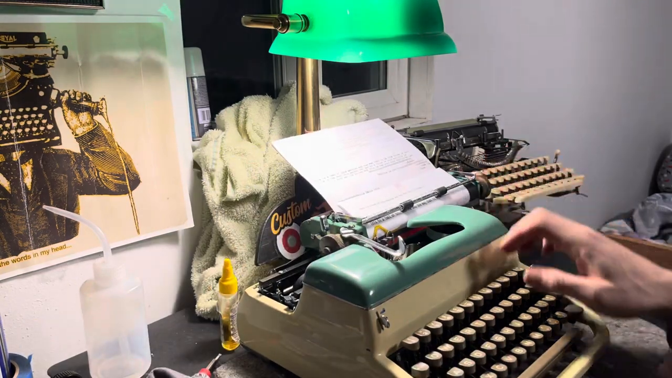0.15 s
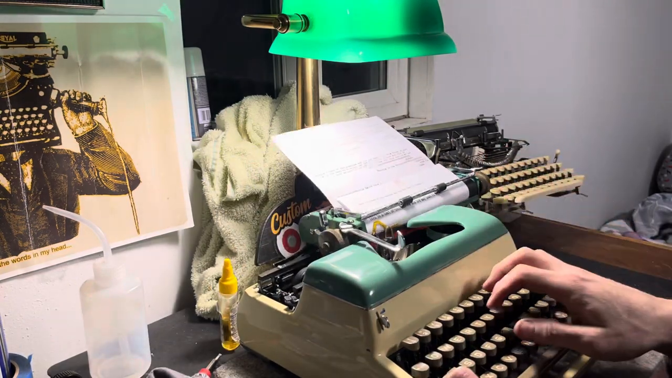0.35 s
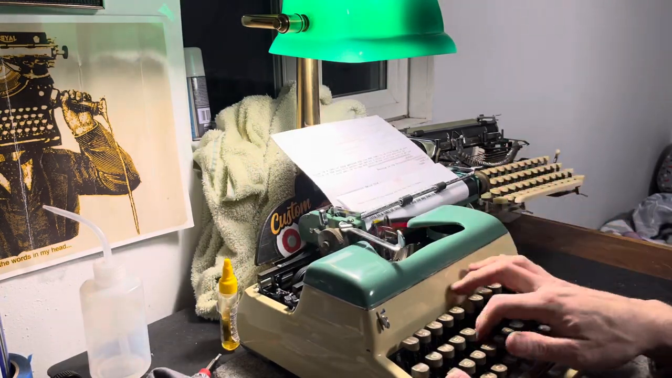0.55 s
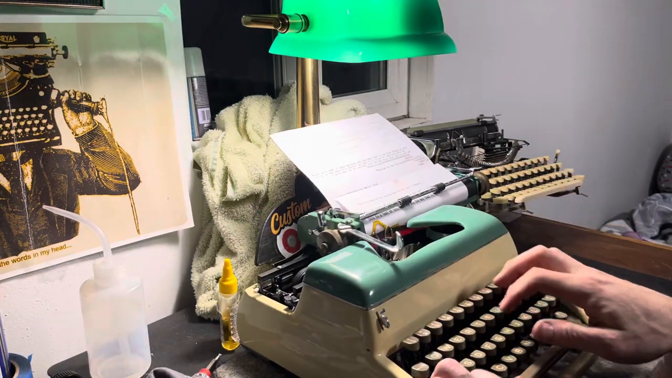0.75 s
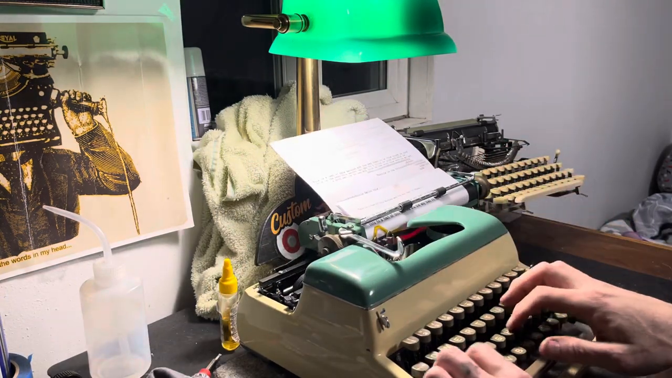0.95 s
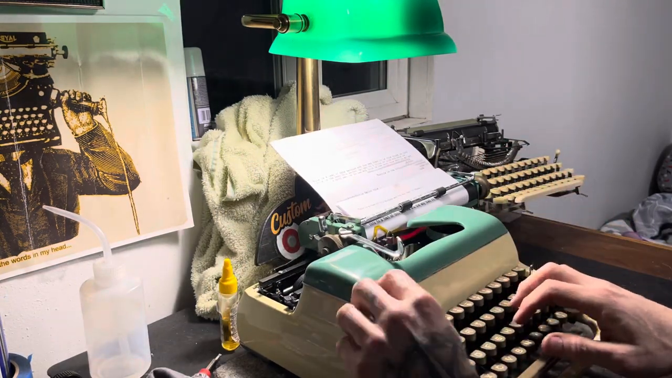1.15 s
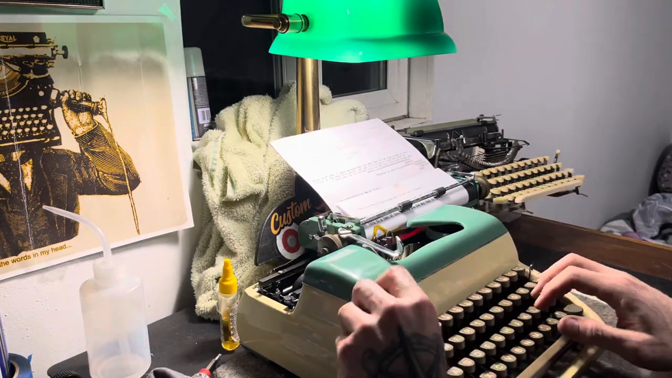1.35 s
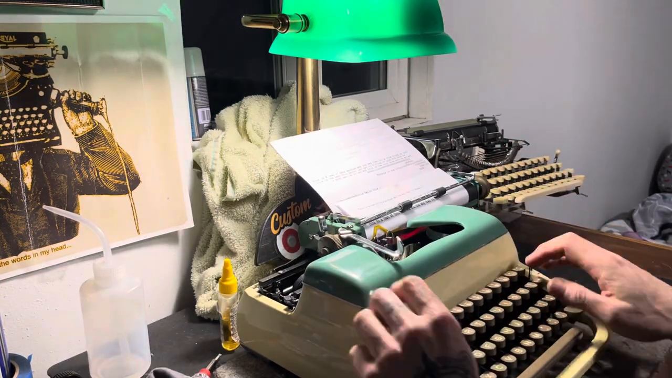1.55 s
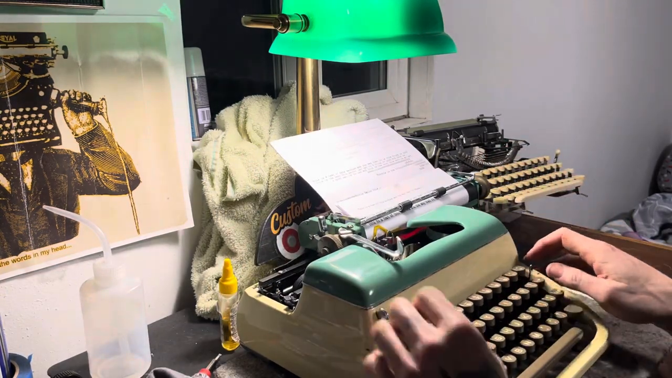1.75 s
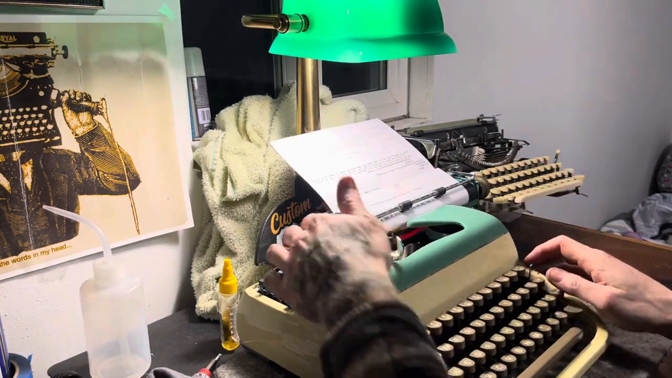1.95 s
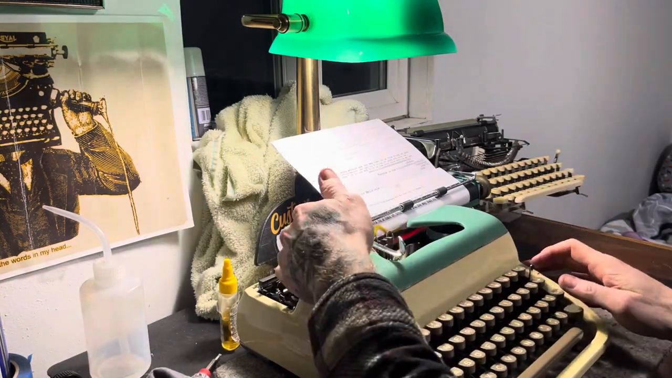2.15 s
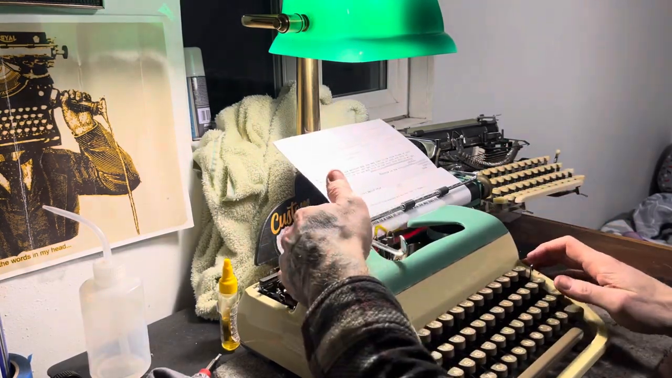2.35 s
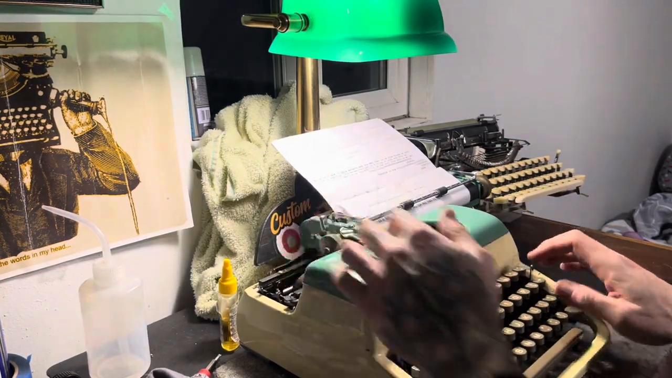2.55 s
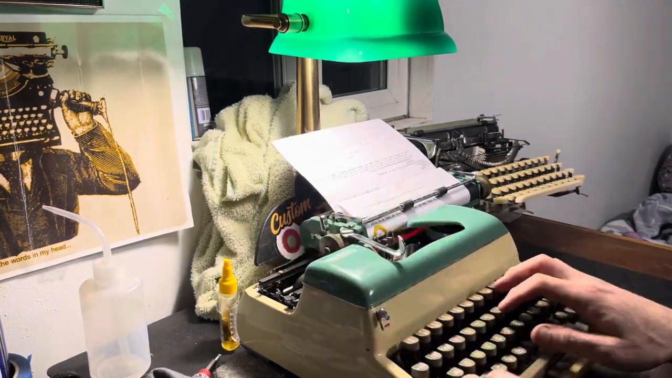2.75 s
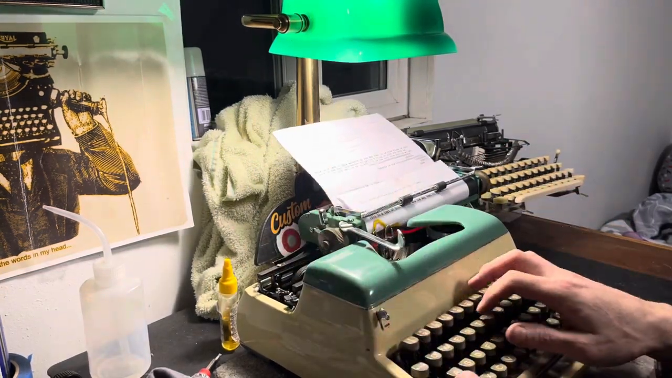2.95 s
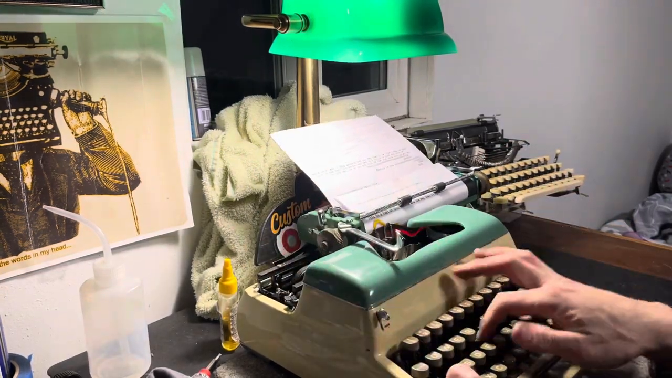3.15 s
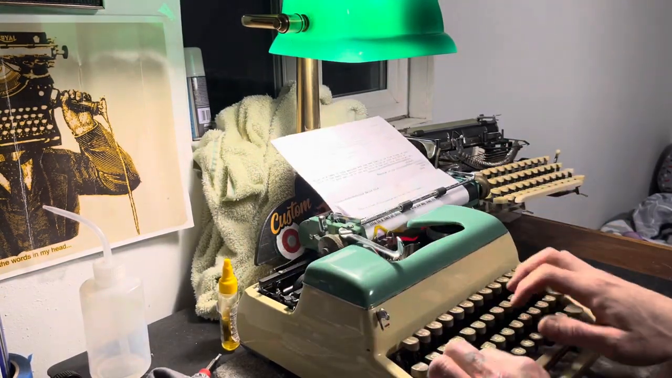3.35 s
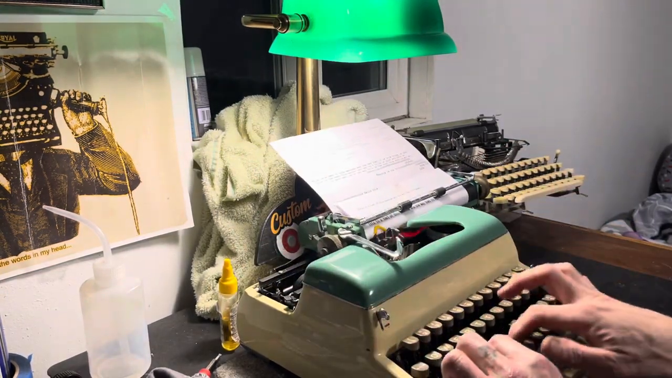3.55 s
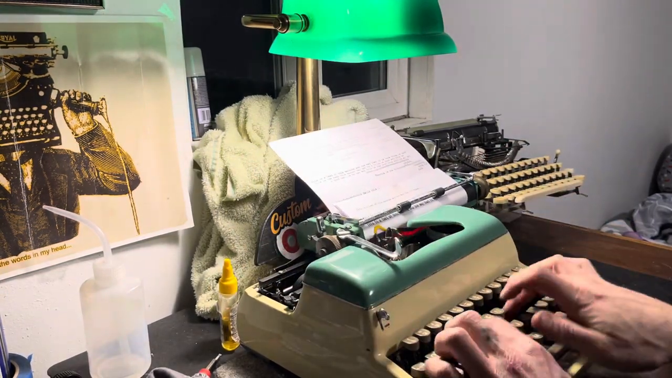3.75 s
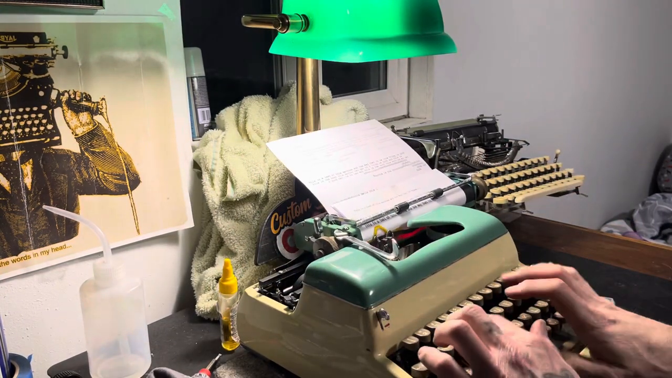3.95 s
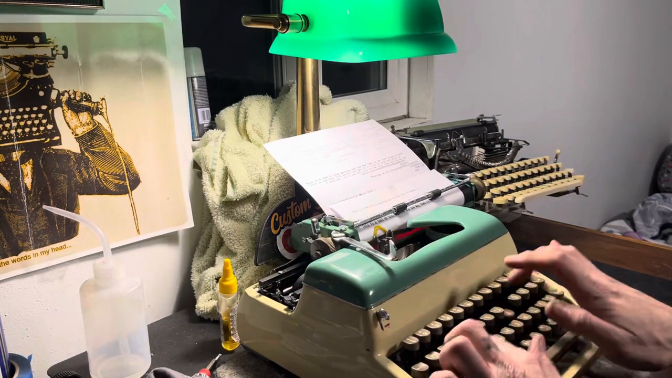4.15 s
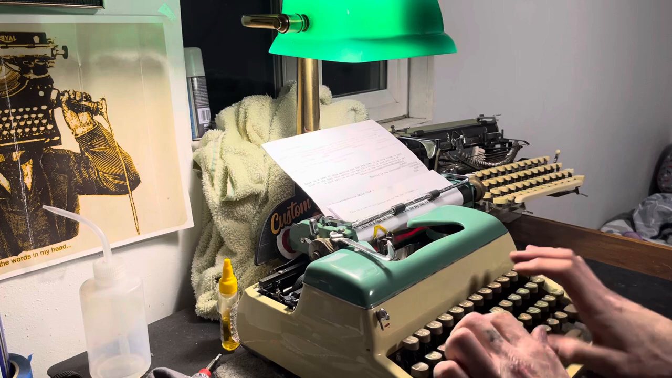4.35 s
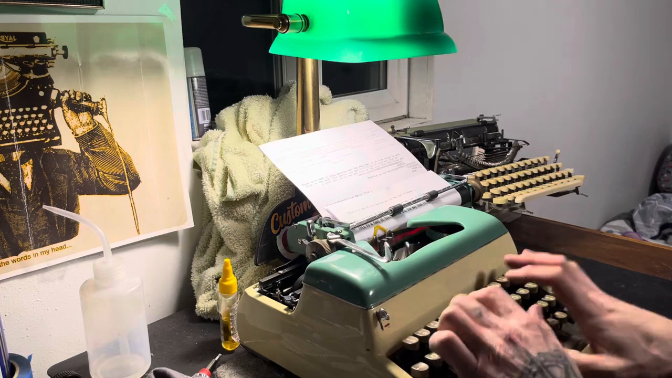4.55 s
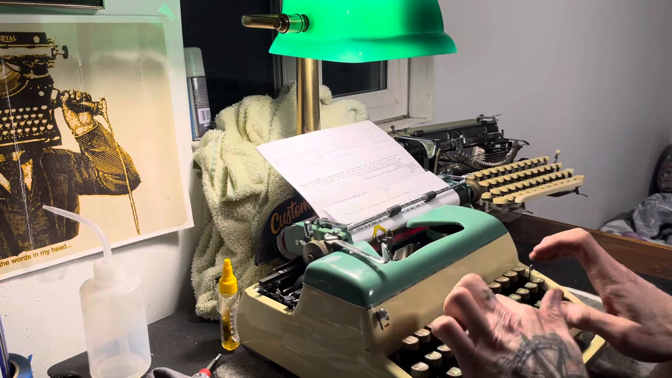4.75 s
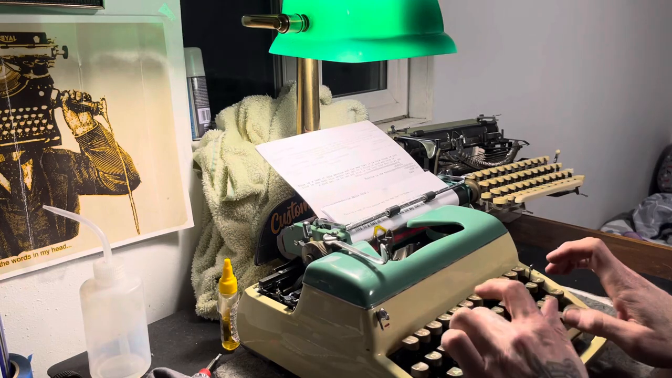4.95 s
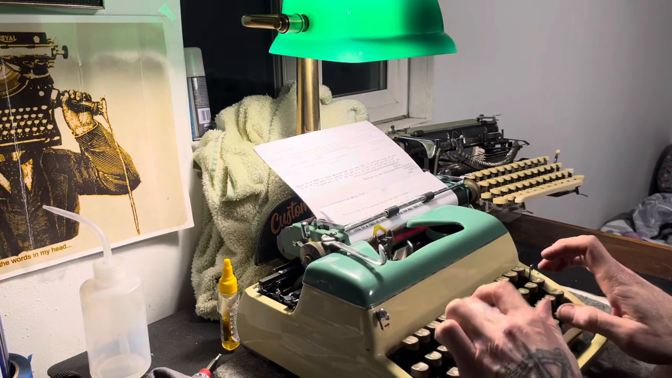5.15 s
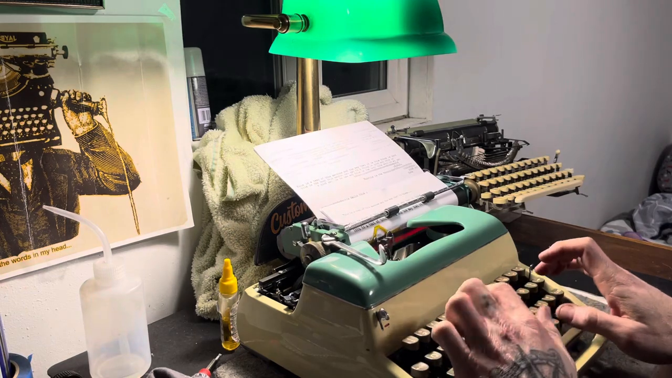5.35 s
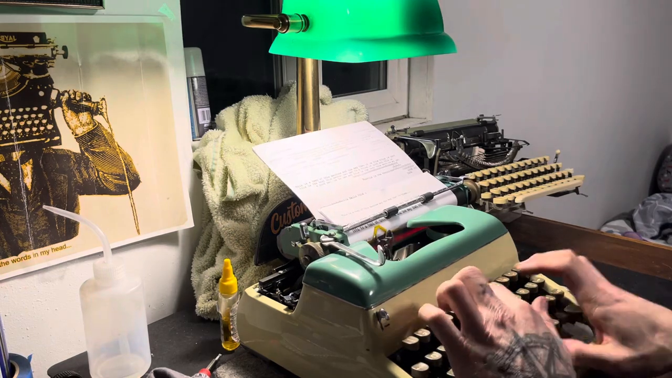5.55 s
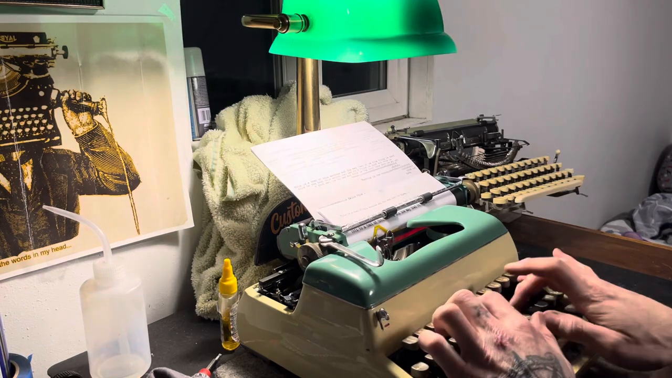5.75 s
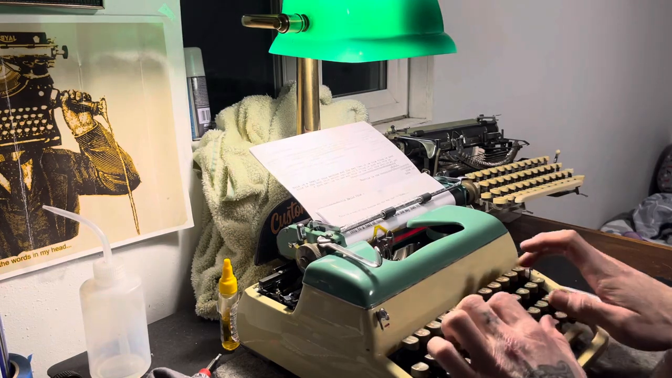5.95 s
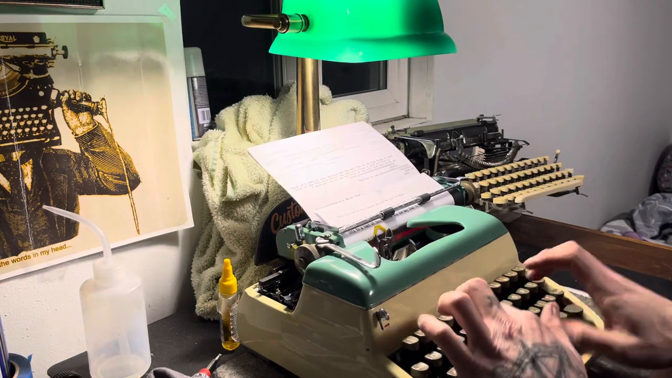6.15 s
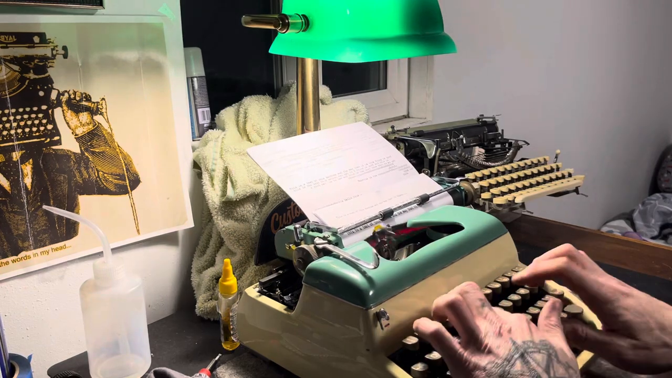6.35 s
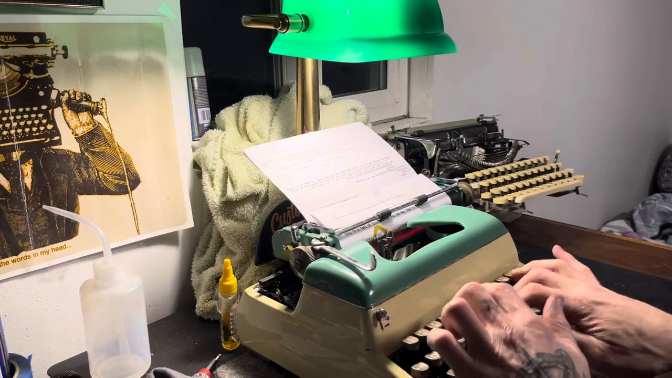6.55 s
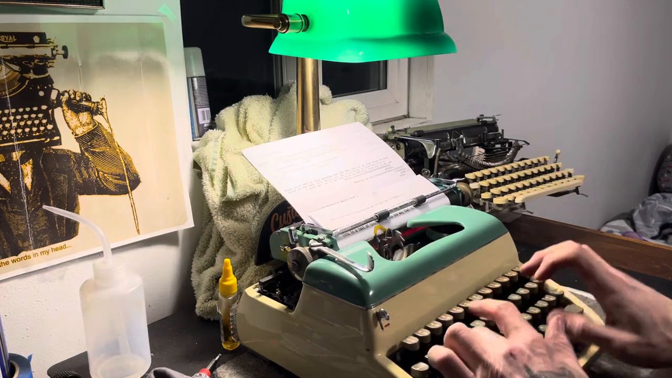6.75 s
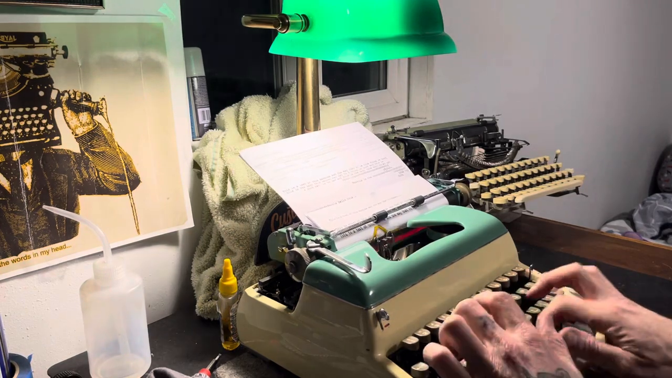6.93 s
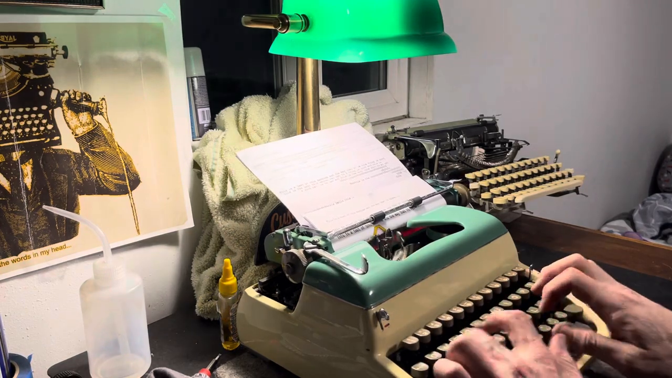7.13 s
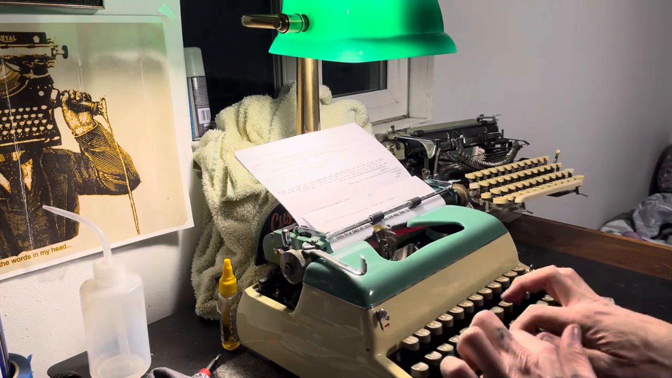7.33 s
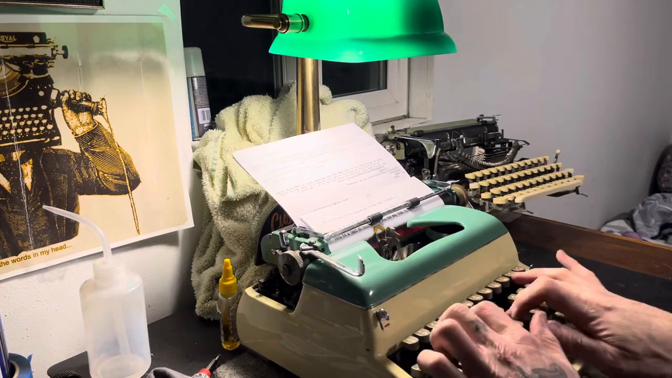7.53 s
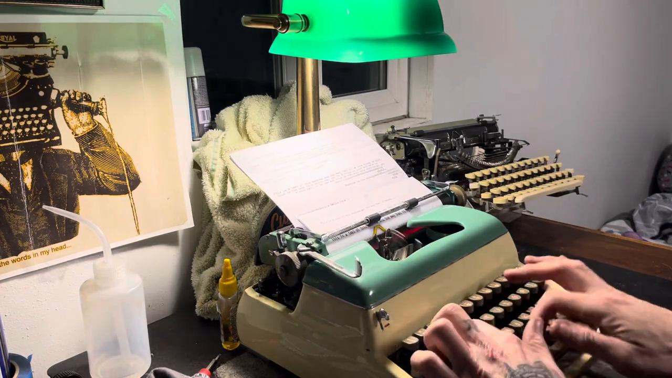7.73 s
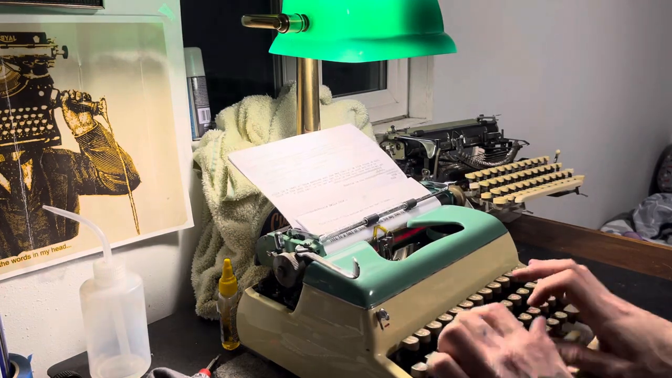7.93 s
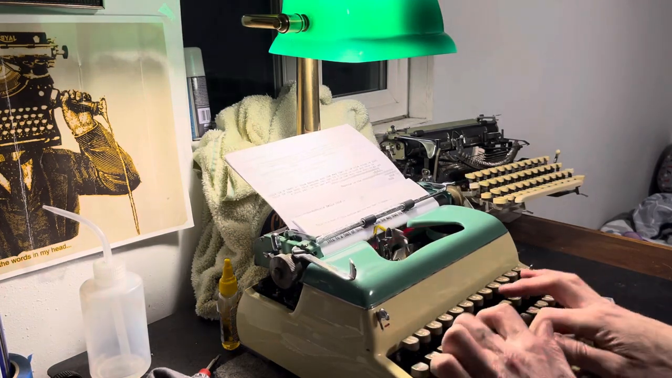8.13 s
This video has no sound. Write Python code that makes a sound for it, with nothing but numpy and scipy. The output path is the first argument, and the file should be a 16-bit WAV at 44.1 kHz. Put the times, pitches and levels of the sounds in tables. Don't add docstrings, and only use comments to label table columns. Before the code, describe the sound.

A manual typewriter on a wooden desk: two isolated key cracks, hollow carriage thunks, quiet handling clicks, then fast steady typing in a small room.

```python
import sys
import numpy as np
from scipy import signal
from scipy.fft import rfft, irfft, next_fast_len
from scipy.io import wavfile
from scipy.ndimage import uniform_filter1d, map_coordinates

SR = 44100
rng = np.random.default_rng(int(sys.argv[2]) if len(sys.argv) > 2 else 0)


def output_pcm(signal):
    pcm = np.clip(np.atleast_2d(signal).T, -1, 1) * 32767
    wavfile.write(sys.argv[1], SR, np.round(pcm).astype(np.int16))


def magnitude_from_level(level_db):
    exponent = np.asarray(level_db, float) / 20
    return 10 ** exponent


N = 365588


# (time [s], peak level [dB], type bar pitch [Hz], air level [dB], platen ring [dB])
STRIKES = [(0.5698, -6.5, 2230, -14.5, -0.5), (1.3195, -13, 1800, -9.5, -5.5), (3.141, -3.5, 2230, -16, -4),
           (3.5469, -4.5, 2160, -20, -1), (3.728, -8, 2170, -10, -1.5), (3.834, -9, 2140, -14.5, 2.5),
           (4.0703, -9, 2170, -8, -2.5), (4.198, -10, 2140, -16.5, -0.5), (4.4461, -8.5, 2180, -13.5, 4.5),
           (4.7087, -10, 2150, -6.5, -7), (4.858, -8.5, 2070, -14.5, 3.5), (5.042, -9.5, 2110, -10.5, 4),
           (5.448, -10, 2040, -6, -3), (5.7813, -8, 2140, -18.5, -1), (6.0848, -8, 2110, -6, 0),
           (6.352, -8.5, 2320, -9.5, -2.5), (6.4547, -7, 2200, -19, 0.5), (6.5979, -8.5, 2330, -17, 2),
           (6.707, -7.5, 2310, -16, -1), (7.001, -9, 2090, -15, -0.5), (7.0714, -7.5, 2180, -18.5, -5),
           (7.2501, -10.5, 2300, -16, 0.5), (7.3532, -6, 2250, -18, -2), (7.5295, -9, 2110, -15, -1.5),
           (7.6709, -10, 2020, -17, 1.5), (7.7658, -10.5, 2240, -19.5, -1.5), (8.022, -10.5, 2250, -17, -2),
           (8.117, -7, 2220, -21, -5), (8.2406, -9.5, 2220, -24.5, -2.5)]
# (shift key down [s], let go [s], carriage lands [s])
SHIFTS = [
    (0.375, 0.714, 0.8185),
    (2.9515, 3.2896, 3.3503),
]


def strikes():
    rows = []
    for s, db, hz, air_db, ring_db in STRIKES:
        shifted = any(down < s < up for down, up, _ in SHIFTS)
        rows.append((s, db, hz, ring_db, air_db, -28 + 2 * shifted))
    return np.array(rows)


# (pitch at line start [Hz], at end [Hz], level at start [dB], middle [dB], end [dB])
PLATEN_MODES = [(1980, 1780, -10.5, -8, 0.5), (2820, 2750, -1, 0, -1.5), (3180, 3050, -3.5, -11, 3),
                (3300, 3290, -12, -5, -8), (3660, 3630, -14.5, -2.5, -22), (3830, 4020, -9.5, 0, -26)]
LINE_TIMES = (3.5, 6.2, 8.1)
BAR_LEVELS = (-4.5, -6.5, -11)


def slugs():
    out, t = np.zeros(N + SR), np.arange(4096) / SR
    noise = rng.standard_normal((len(STRIKES), 2, len(t)))
    phases = rng.normal(0, 0.59, (len(STRIKES), len(PLATEN_MODES) + 1))
    fade = magnitude_from_level(-60 * t / 0.033) / (1 + (t / .007) ** 4)
    frame = modes([(4630, 180, -2), (6130, 280, -0.19)])
    for (s, db, bar_hz, ring_db, air_db, _), (hit, shake), phase in zip(strikes(), noise, phases):
        notes = [(bar_hz, np.interp(s, LINE_TIMES, BAR_LEVELS) - ring_db)]
        for first_hz, last_hz, *levels in PLATEN_MODES:
            hz = np.interp(s, LINE_TIMES[::2], (first_hz, last_hz))
            notes.append((hz, np.interp(s, LINE_TIMES, levels)))
        tightness = 0.025 * s
        core = (1 + tightness * np.exp(-((t - .002) / 0.00096) ** 2)) / (1 + .5 * tightness)
        blow = hit * core * (1 - np.exp(-t / 0.0015)) * (fade + 0.16 * magnitude_from_level(-60 * t / 0.003))
        ring = sum(magnitude_from_level(ring_db + level_db) * np.sin(2 * np.pi * hz * t + turn)
                   for (hz, level_db), turn in zip(notes, phase))
        ring *= 0.5 * core * fade * (1 - np.exp(-(t / 0.0004) ** 2))
        rough = filtered(shake, modes([(hz, 200, level_db) for hz, level_db in notes]))
        tail = unit(rough) * magnitude_from_level(-28.0 - 60 * t / 0.11)
        place(out, s, magnitude_from_level(db - 2.5) * (0.47 * crack(blow, frame, air_db + 18) + ring + tail))
    return out[:N]


# (frequency [Hz], level per Hz [dB])
CRACK_COLOUR = [(600, -21.5), (1200, 6.5), (2000, 6.5), (3000, 7), (4500, 4), (6500, 1), (9000, 0.5),
                (12500, -15.5), (15000, -10.5), (16500, -23)]


def crack(blow, rings, air_db):
    colour = lambda f: magnitude_from_level(along(CRACK_COLOUR, f))
    body = filtered(blow, lambda f: colour(f) * (4.6 + rings(f)) / (1 + (f / 8000) ** 6))
    air = filtered(blow, lambda f: colour(f) / (1 + (8000 / (f + 1)) ** 6))
    return body / np.abs(body).max() + magnitude_from_level(air_db) * air / np.abs(air).max()


# (time [s], peak
# level [dB], case knock [dB], ping pitch [Hz])
PRESSES = [(0.533, -22, -1.5, 3120), (1.303, -44.5, 12, 2110), (3.1076, -24, -5.5, 4340),
           (3.5076, -27.5, -9, 2490), (3.694, -23, 0.5, 4050), (3.8164, -27, 0, 2700),
           (4.037, -25, 0, 4200), (4.1784, -25, 3, 2950), (4.3923, -32, -7, 2050), (4.672, -29.5, -1, 3900),
           (4.8259, -21.5, -6, 3540), (5.0065, -27, -1, 3170), (5.4101, -28, -2, 2060),
           (5.7384, -27, -9, 3640), (6.0528, -27, -1, 2200), (6.3145, -25.5, -5.5, 5400),
           (6.4174, -29, -12, 4290), (6.557, -27, -3, 3870), (6.6897, -18, 0, 2230),
           (6.9616, -31.5, -4, 4260), (7.0414, -28.5, -2, 3080), (7.2327, -24, -6, 1930),
           (7.3094, -34.5, -3, 3200), (7.4937, -25.5, -6.5, 3900), (7.6485, -28, 4, 3000),
           (7.736, -29.5, -7, 3860), (7.9748, -27, -2, 2100), (8.109, -28.5, 10.5, 3020),
           (8.2037, -28, -6.5, 4300)]


def presses():
    rows = []
    for (s, db, knock_db, hz), (hit, *_) in zip(PRESSES, STRIKES):
        t60 = 12 * (hit - s) * magnitude_from_level(0.92 * min(-26 - db, 3))
        rows.append((s, db, knock_db, -33 - db, t60, hz))
    return rows


# (time [s], peak level
# [dB], t60 [s], ping pitch [Hz])
FALLS = [(3.658, -30, 0.26, 3430), (3.884, -30.5, 0.24, 2010), (3.9332, -34.5, 0.25, 3400),
         (3.9874, -28.5, 0.088, 4300), (4.281, -32, 0.42, 3600), (4.319, -27, 0.11, 3180),
         (4.5176, -35, 0.29, 5330), (4.5856, -41.5, 0.032, 3200), (4.784, -33, 0.94, 3120),
         (4.9276, -39.5, 0.13, 1770), (4.989, -28.5, 0.14, 2430), (5.1577, -33.5, 0.14, 6200),
         (5.1955, -23.5, 0.044, 2080), (5.5628, -31, 0.27, 2430), (5.679, -27, 0.15, 3700),
         (6.197, -33.5, 0.22, 3560), (6.804, -33.5, 0.49, 2600), (6.9187, -27.5, 0.37, 1960),
         (7.2217, -38, 0.088, 2650), (7.2694, -25, 0.065, 3030), (7.339, -25.5, 0.14, 1700),
         (7.4752, -40, 0.078, 2540), (7.621, -36.5, 0.16, 1950), (7.652, -23.5, 0.058, 3380),
         (7.868, -34, 0.26, 3440)]


def falls():
    return [(s, db, -31.5 - db, -36.5 - db, t60, hz) for s, db, t60, hz in FALLS]


# (time [s], peak level [dB], ping pitch [Hz])
STOPS = [(4.009, -26.5, 3070), (4.333, -37, 3100), (4.622, -29, 3300), (4.637, -25, 3420),
         (5.207, -30, 3260), (5.59, -32, 2030), (5.692, -26, 3640), (5.903, -25.5, 2010),
         (6.2308, -26.5, 2500), (6.8474, -27.5, 2460), (7.8247, -30.5, 2090), (7.8942, -25.5, 2110)]


def stops():
    return [(s, db, -20.5 - db, -33 - db, 0.11, hz) for s, db, hz in STOPS]


# (time after its moment [s], peak level [dB], case knock [dB], desk thud [dB], t60 [s])
SHIFT_DOWN = [
    (-.03, -52.5, -0.5, 15.5, 0.55),
    (0, -19, 5, -8, 0.09),
    (0.017, -20.5, 4, -3, .115),
    (0.032, -28.5, 22.5, 6, 0.065),
]
SHIFT_LET_GO = [
    (-.03, -36.5, -38, -5.5, 0.18),
    (0, -25.5, 3.5, -6.5, 0.14),
]
SHIFT_LANDS = [
    (0.0018, -14, 14, -6.5, 0.1),
]


def shifts():
    rows = []
    for moments in SHIFTS:
        for s, steps in zip(moments, (SHIFT_DOWN, SHIFT_LET_GO, SHIFT_LANDS)):
            rows += [(s + after, *step, 3000) for after, *step in steps]
    return rows


# (time [s], peak level [dB], case knock [dB], desk thud [dB], t60 [s])
HANDS = [(0.3077, -55.5, 30, 22, 0.12), (0.7712, -44.5, 1, -24.5, 0.46), (1.313, -20.5, 8, -42, 0.11),
         (1.324, -16, -3, -41, 0.037), (1.4423, -32, 5.5, -26, 0.056), (2.187, -38.5, 7.5, 1, 0.19),
         (2.209, -33, 2, -5.5, 0.11), (2.2396, -39.5, 0, -7, 0.066), (2.422, -45, 12.5, 9, 0.17),
         (1.84, -75, 22, 9.5, 0.36), (2.251, -54, -0.5, 5.5, 0.23), (2.46, -57.5, -2, 5, 0.37),
         (2.745, -76, 17.5, 23, 0.13)]


def hands():
    return [(*row, 2060) for row in HANDS]


def moves():
    touches = [(s, db - 3 + .3 * min(air_db, 0), 14, -15, 0.12, hz) for s, db, air_db, hz in TICKS]
    return np.array(presses() + falls() + stops() + shifts() + hands() + touches)


# (frequency [Hz], level per Hz [dB])
RATTLE_COLOUR = [(500, -29.5), (900, 2.5), (1500, -0.5), (2000, 1), (3000, 1.5), (5000, 0.5), (8000, -6),
                 (11000, -16), (14000, -17), (15600, -14.5), (16100, -53)]
# (pitch [Hz], width [Hz], level [dB])
BAR_MODES = [(1285, 30, -2), (1770, 40, -3), (2060, 50, 2), (2640, 40, -2), (3035, 40, 2), (3870, 40, -3),
             (4081, 30, -2), (4613, 25, 2), (5195, 30, -2), (5420, 30, 3), (5750, 25, -3), (6252, 15, -3),
             (6830, 30, -4), (9270, 60, -2), (10710, 60, -2), (11020, 40, -2)]


def linkage():
    move, strike = moves().T, strikes().T
    loose = bursts(move[0], move[1] - 7.5, move[4], attack=0.0028)
    after = bursts(strike[0], .5 * strike[1] - 24, 0.14, attack=0.0088)
    gust_db = rng.normal(0, 3.5, len(move[0]))
    bright = bursts(move[0], move[1] - 12 + gust_db, 0.82 * move[4], attack=0.0033)
    bright_after = bursts(strike[0], 0.049 * strike[4] - 26, 0.03, attack=0.0021)
    bars = modes(BAR_MODES)
    steel = lambda f: magnitude_from_level(along(RATTLE_COLOUR, f)) * (.8 + 1.15 * bars(f))
    low = lambda f: 1 / (1 + (f / 7800) ** 8)
    rattle = np.hypot(loose, after)
    near, far = (shaken(rattle, lambda f: steel(f) * low(f), rate=360, depth_db=2.5) for _ in range(2))
    hiss = np.hypot(bright, bright_after)
    air = shaken(hiss, lambda f: steel(f) * (1 - low(f)), rate=80, depth_db=3.0)
    far = filtered(far, lambda f: 1 + modes([(1350, 500, 2)])(f))
    return patchy(near, 3.9) + patchy(air, 3) + 0.4 * patchy(far, 2.4) * [[1], [-1]]


# (pitch [Hz], level [dB], t60 [s])
SPRINGS = [(2094, -1.5, .25), (3140, -2.5, .33), (4081, -0.5, 0.22), (4605, 6, 0.25), (5160, -0.5, 0.16),
           (5470, 0, 0.18), (5720, -5.5, 0.27), (6200, -4.5, .38)]


def pings():
    out, t = np.zeros(N + SR), np.arange(SR // 4) / SR
    rise = 1 - np.exp(-t / 0.00083)
    for s, db, _, _, t60, hz in moves():
        decay = magnitude_from_level(db - 12.5 - 60 * t / max(0.17 * t60, .01))
        place(out, s, decay * np.sin(2 * np.pi * hz * t) * rise)
        for note, level, life in SPRINGS:
            hum_db = 0.91 * db - 41 + level + 4.4 * np.sin(note * s)
            place(out, s, magnitude_from_level(hum_db - 60 * t / life) * np.sin(2 * np.pi * note * t))
    return out[:N]


# (time [s], peak level [dB], ring pitch [Hz])
CLACKS = [(3.5139, -25, 2440), (3.659, -28.5, 3450), (3.696, -25, 3940), (3.9341, -26, 3530),
          (3.9898, -32, 4250), (4.0118, -32, 3080), (4.038, -24, 4220), (4.2822, -25.5, 3400),
          (4.3345, -27, 3140), (4.3928, -26.5, 2080), (4.5151, -34, 5390), (4.6229, -31.5, 3470),
          (4.6391, -25.5, 3610), (4.6717, -21.5, 3860), (4.788, -24, 3090), (4.8259, -20, 3410),
          (5.0045, -28.5, 3200), (5.161, -36, 5940), (5.2094, -24.5, 3170), (5.4127, -30, 3330),
          (5.4201, -30.5, 2100), (5.5628, -30, 3830), (5.681, -32, 3640), (5.692, -26.5, 3660),
          (5.7404, -29.5, 3560), (5.9158, -23.5, 2060), (6.0537, -25.5, 2100), (6.1985, -29, 3360),
          (6.235, -30, 2560), (6.3064, -25, 3590), (6.316, -20.5, 5430), (6.559, -20, 4330),
          (6.5687, -24, 2200), (6.8072, -27.5, 2550), (6.8488, -33.5, 2550), (6.8638, -28.5, 2950),
          (6.9266, -22, 2030), (6.9611, -28.5, 4320), (7.4922, -25.5, 3870), (7.625, -35.5, 2010),
          (7.8251, -33.5, 2070), (7.87, -28.5, 3370), (7.8935, -34, 2090), (7.9768, -27.5, 2050),
          (8.081, -40, 2090), (8.205, -28.5, 4290)]


def clacks():
    out, t = np.zeros(N + SR), np.arange(2048) / SR
    noise = rng.standard_normal((len(CLACKS), len(t)))
    for (s, db, ring_hz), hit in zip(CLACKS, noise):
        blow = hit * magnitude_from_level(-60 * t / 0.039) * (1 - np.exp(-t / 0.00047))
        place(out, s, magnitude_from_level(db - 6.5) * crack(blow, modes([(ring_hz, 400, 10)]), 2.4))
    return out[:N]


# (time [s], peak level [dB], note [Hz])
RAPS = [(3.519, -36, 856), (3.531, -28, 615), (3.549, -30, 644), (3.679, -29, 624), (3.827, -35, 604),
        (3.888, -27, 630), (4.01, -39, 600), (4.044, -37, 630), (4.202, -29, 635), (4.216, -24, 856),
        (4.388, -27.5, 603), (4.401, -27, 660), (4.449, -26, 610), (4.526, -30, 610), (4.628, -33, 650),
        (4.685, -29, 628), (4.797, -30, 650), (4.809, -25, 630), (4.862, -27, 600), (5.001, -25.5, 830),
        (5.208, -28, 637), (5.418, -32.5, 590), (5.571, -36, 496), (5.595, -25.5, 650), (5.683, -27, 630),
        (5.873, -32, 634), (5.912, -23, 844), (6.059, -41, 594), (6.085, -25.5, 622), (6.212, -33, 620),
        (6.24, -31, 990), (6.314, -23.5, 630), (6.353, -44, 665), (6.439, -26.5, 600), (6.568, -33, 610),
        (6.698, -31, 630), (6.82, -34, 620), (6.921, -24.5, 634), (7.001, -31, 920), (7.052, -37, 630),
        (7.074, -30, 910), (7.182, -35.5, 845), (7.235, -38, 1020), (7.252, -31, 934), (7.354, -35, 886),
        (7.43, -31, 890), (7.663, -36, 860), (7.767, -30, 885), (7.829, -37, 874), (7.879, -39, 540),
        (7.903, -27, 860), (7.978, -25.5, 657), (8.023, -42, 865), (8.055, -36, 630), (8.117, -30, 575),
        (8.229, -29, 622)]


def raps():
    out, t = np.zeros(N + SR), np.arange(SR // 8) / SR
    for s, db, hz in RAPS:
        note = np.sin(2 * np.pi * hz * t) + 0.35 * np.sin(2 * np.pi * 1.37 * hz * t)
        place(out, s, magnitude_from_level(db - 0.5 - 60 * t / 0.043) * (1 - np.exp(-t / 0.0012)) * note)
    return out[:N]


# (time [s], hollow knock [dB], boom [dB])
DROPS = [
    (0.3943, -24, -18.5),
    (0.822, -8, -18.5),
    (.873, -23, -32.5),
    (2.967, -25, -16),
    (3.352, -7, -16),
    (3.41, -22.5, -31.5),
]
# (pitch [Hz], width [Hz], level [dB])
CARRIAGE_MODES = [(210, 220, 3.5), (335, 61, -0.5), (540, 33, -1.5), (634, 170, -0.5), (860, 220, 3)]


def carriage():
    out, t = np.zeros(N + SR), np.arange(SR // 3) / SR
    blow = np.exp(-((t - .002) / 0.000063) ** 2) - 0.45 * np.exp(-((t - .006) / 0.00054) ** 2)
    knock = filtered(blow, modes(CARRIAGE_MODES))
    thunk = np.exp(-((t - .004) / 0.002) ** 2) * np.sin(2 * np.pi * 575 * t)
    knock = 0.46 * knock / np.abs(knock).max() + 0.61 * thunk
    knock /= np.abs(knock).max()
    boom = np.sin(2 * np.pi * 91 * t) + 0.43 * np.sin(2 * np.pi * 190 * t)
    boom *= magnitude_from_level(-60 * t / 0.27) * (1 - np.exp(-t / 0.0051))
    for s, knock_db, boom_db in DROPS:
        place(out, s, magnitude_from_level(knock_db) * knock + magnitude_from_level(boom_db) * boom)
    return out[:N]


# (time [s], peak level [dB], air level [dB], ring pitch [Hz])
TICKS = [(1.1992, -54, -19, 3180), (1.268, -50.5, -1.5, 4050), (1.443, -50, 4.5, 2070),
         (1.552, -44.5, -16.5, 2000), (1.6016, -43.5, -11, 2050), (2.0084, -52.5, 2.5, 2000),
         (2.075, -69, -20, 5900), (2.106, -68, -21.5, 5930), (2.127, -54, -38.5, 3000),
         (2.17, -49.5, -12, 2090), (2.1884, -48.5, 3, 1960), (2.2076, -41, -1.5, 2040),
         (2.382, -56.5, -8.5, 3020), (2.4241, -57.5, -20, 2690), (2.4491, -42.5, -4.5, 2060),
         (2.8794, -55, -9, 3380), (5.2776, -40, -33, 2130), (5.9888, -40, -19, 2960)]


def ticks():
    out, t = np.zeros(N + SR), np.arange(2048) / SR
    noise = rng.standard_normal((len(TICKS), len(t)))
    for (s, db, air_db, ring_hz), hit in zip(TICKS, noise):
        blow = hit * magnitude_from_level(-60 * t / 0.026) * (1 - np.exp(-t / .001))
        place(out, s, magnitude_from_level(db + 0.5) * crack(blow, modes([(ring_hz, 500, 28)]), air_db + 11.5))
    return out[:N]


# (pitch [Hz], width [Hz], level [dB])
CASE_MODES = [(324.3, 42, -3.5), (539, 118, -5), (630, 53.4, 1.5), (856, 99, -5.5)]


def case():
    move, strike = moves().T, strikes().T
    light_db = np.minimum(move[1] + move[2], -14)
    knock = bursts(move[0], light_db - 3, 0.5 * move[4], attack=0.015)
    echo = bursts(strike[0], strike[1] + strike[5] - 1, 0.2, attack=0.0022)
    shell = modes(CASE_MODES)
    near, far = (shaken(np.hypot(knock, echo), shell, rate=55, depth_db=1.5) for _ in range(2))
    return near + 0.15 * far * [[1], [-1]]


# (pitch [Hz], width [Hz], level [dB])
DESK_MODES = [(72, 36.6, -4.5), (93.6, 10, 1.5), (129.4, 8.7, -12.5), (196.4, 26, -4), (260, 67, -10)]


def desk():
    move, strike = moves().T, strikes().T
    push = bursts(move[0], move[1] + move[3] + 3, 0.19, attack=0.013)
    jolt = bursts(strike[0], strike[1] - 25, 0.41, attack=0.0022)
    return shaken(np.hypot(push, jolt), modes(DESK_MODES), rate=55, depth_db=2.0)


# (time [s], peak level [dB])
THUMPS = [(3.559, -34), (3.733, -33), (3.843, -34), (3.963, -32), (4.078, -35), (4.321, -34),
          (4.549, -29.5), (4.721, -32), (4.929, -38), (5.055, -36), (5.159, -37), (5.46, -33),
          (5.598, -28.5), (6.09, -33), (6.238, -31.5), (6.512, -36), (6.842, -29.5), (7.056, -30),
          (7.334, -36), (7.418, -33), (7.606, -35), (8.135, -31)]


def thumps():
    out, t = np.zeros(N + SR), np.arange(SR // 3) / SR
    boom = np.sin(2 * np.pi * 91 * t) + 0.87 * np.sin(2 * np.pi * 68 * t)
    boom *= magnitude_from_level(-60 * t / 0.25) * (1 - np.exp(-t / 0.01))
    for s, db in THUMPS:
        place(out, s - .008, magnitude_from_level(db + 0.5) * boom)
    return out[:N]


# (frequency [Hz], t60 [s])
WALLS = [(100, 0.26), (600, 0.22), (3000, 0.23), (12000, 0.25)]


def room(x):
    out, step = np.zeros((2, N + SR)), SR // 3
    for start in range(0, N, step):
        hz, t, z = signal.stft(rng.standard_normal((2, step)), SR, nperseg=256)
        decay = magnitude_from_level(-60 * t / along(WALLS, hz)[:, None])
        tail = signal.istft(z * decay, SR, nperseg=256)[1]
        wet = signal.fftconvolve(x[None, start:start + step], tail / np.linalg.norm(tail[0]), axes=1)
        out[:, start + 200:][:, :wet.shape[1]] += wet
    return diffuse(out[:, :N], [(100, -2.5), (1000, 3.5), (3000, -3.5), (15200, -5.5), (16100, -31.0)])


# (frequency [Hz], level per Hz [dB])
HOUSE_COLOUR = [(20, -9.5), (35, -11.5), (59, 3), (80, -9.5), (110, -14.5), (160, -21.5), (200, -20.5),
                (248, -10), (290, -25.5), (500, -30), (1100, -30.5), (2000, -43.5), (4500, -61.5),
                (14000, -65.5)]


def house():
    drift = np.array([patchy(grit(9, 1.5), 2), patchy(grit(3, 1.5), 2)])
    return magnitude_from_level(-48.5) * unit(diffuse(drift, HOUSE_COLOUR))


# (frequency [Hz], left lead [rad])
LEAD = [(0, 0), (1900, .1), (2900, .8), (4000, .45), (5000, 0), (6000, -.85), (7000, -1.7), (8000, -3),
        (8700, -3.2), (9700, -4.2), (11000, -5.9), (12400, -6.4), (13500, -7.4), (14800, -9.2),
        (17000, -9.6)]
# (frequency [Hz], left minus right [dB])
LEAN = [(300, .4), (1400, -.5), (2400, .5), (4200, 2.8), (6500, 1), (8500, 0)]


def ports(x, spread=1):
    hz, lead = np.transpose(LEAD)
    side = np.array([[.5], [-.5]])
    tilt = lambda f: magnitude_from_level(side * along(LEAN, f))
    return filtered(x, lambda f: tilt(f) * np.exp(1j * spread * side * np.interp(f, hz, lead)))


# (frequency [Hz], left-right likeness [-1 to 1])
ALIKE = [(60, .98), (250, .5), (600, .2), (1400, -.3), (2000, .5), (5000, 0), (8300, .8), (10000, .3),
         (12000, .8), (13700, .3), (15300, .8)]


def diffuse(pair, points):
    turn = lambda hz: np.arccos(np.clip(along(ALIKE, hz), -1, 1)) / 2
    mid, side = filtered(pair, lambda hz: magnitude_from_level(along(points, hz)) * [np.cos(turn(hz)), np.sin(turn(hz))])
    return np.array([mid + side, mid - side])


def unit(x):
    return x / np.sqrt(np.mean(x ** 2) + 1e-20)


def place(out, s, sound):
    out[round(s * SR):][:len(sound)] += sound


def along(points, hz):
    f, v = np.transpose(points)
    return np.interp(np.log(hz + 1), np.log(f + 1), v)


def filtered(x, response):
    m = next_fast_len(x.shape[-1] + 8192)
    return irfft(rfft(x, m) * response(np.fft.rfftfreq(m, 1 / SR)), m)[..., :x.shape[-1]]


def modes(table):
    def response(f):
        total = 0
        for k, (c, w, db) in enumerate(table):
            total = total + (-1) ** k * magnitude_from_level(db) * 1j * f * w / (c * c - f * f + 1j * f * w)
        return total / (1 + (f / 15600) ** 30)
    return response


def bursts(times, levels_db, t60s, attack):
    power, t = np.zeros(N + SR), np.arange(SR // 2) / SR
    for s, db, t60 in np.broadcast(times, levels_db, t60s):
        place(power, s, (magnitude_from_level(db - 60 * t / max(t60, .01)) * (1 - np.exp(-t / attack))) ** 2)
    return np.sqrt(power[:N])


def grit(rate, depth_db):
    lumps = map_coordinates(rng.standard_normal(int(N * rate / SR) + 4), [np.arange(N) * rate / SR])
    return unit(magnitude_from_level(depth_db * lumps) * rng.standard_normal(N))


def shaken(envelope, response, rate, depth_db):
    noise = grit(rate, depth_db)
    return filtered(envelope * noise, response) / np.std(filtered(noise, response))


def patchy(x, depth_db):
    z = signal.stft(x, nperseg=256)[2]
    field = uniform_filter1d(rng.standard_normal(z.shape), size=2, axis=0)
    gain = magnitude_from_level(depth_db * unit(uniform_filter1d(field, size=11, axis=1)))
    return signal.istft(z * gain / np.sqrt(np.mean(gain ** 2)), nperseg=256)[1][:N]


def scene():
    platen = slugs() + ticks()
    keys = pings() + clacks() + raps() + linkage() + case() + carriage()
    around = keys + magnitude_from_level(-7.0) * room(platen + keys[0]) + house()
    return ports(platen, spread=0.96) + ports(around) + magnitude_from_level(-3.0) * desk() + thumps()


def joint_stereo(x, share=.42, from_hz=7650, jump=18):
    hz, _, z = signal.stft(np.array([x[0] + x[1], x[0] - x[1]]) / 2, SR, nperseg=512)
    power = uniform_filter1d(np.abs(z) ** 2, size=7, axis=1)
    power = np.abs(uniform_filter1d(power, size=3, axis=2))
    treble = (np.abs(z[:, hz > from_hz]) ** 2).sum(axis=(0, 1))
    attack = treble > jump * np.minimum(np.roll(treble, 2), np.roll(treble, -3))
    attack &= treble > 6 * np.median(treble)
    keep = (power > share * power[::-1]) | (hz[:, None] < from_hz) | attack
    balance = np.where(hz[:, None] > 9000, [[[1.2]], [[.7]]], 1)
    mid, side = signal.istft(z * keep * balance, SR, nperseg=512)[1][:, :N]
    return np.array([mid + side, mid - side])


def roll_off(x):
    return signal.sosfilt(signal.butter(12, 16640, fs=SR, output="sos"), x)


def record(dry):
    mix = joint_stereo(dry)
    return roll_off(mix)


dry = scene()
out = record(dry)
output_pcm(out)
```